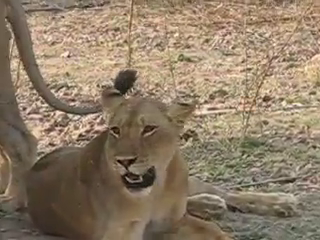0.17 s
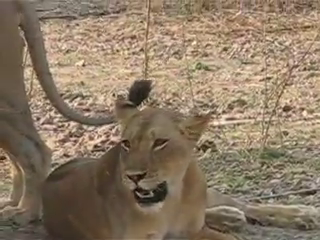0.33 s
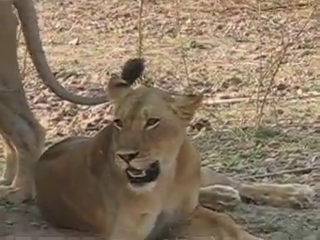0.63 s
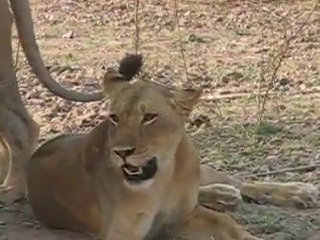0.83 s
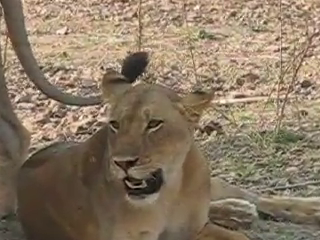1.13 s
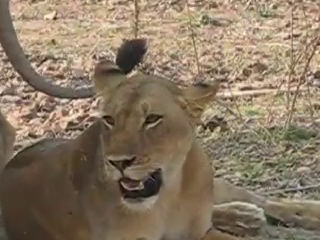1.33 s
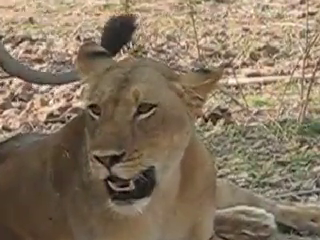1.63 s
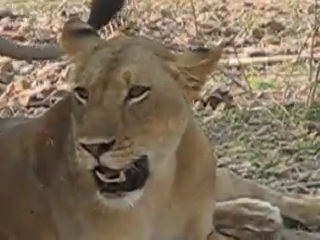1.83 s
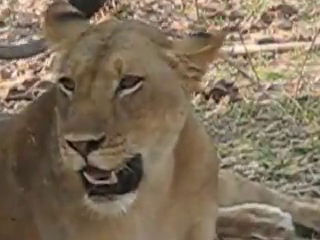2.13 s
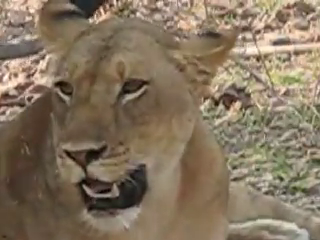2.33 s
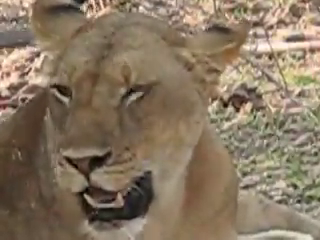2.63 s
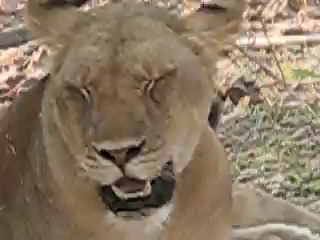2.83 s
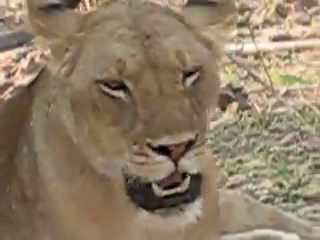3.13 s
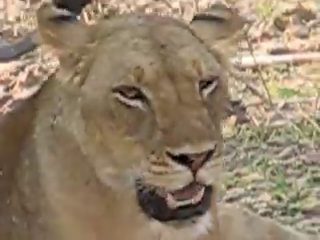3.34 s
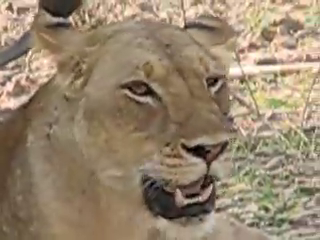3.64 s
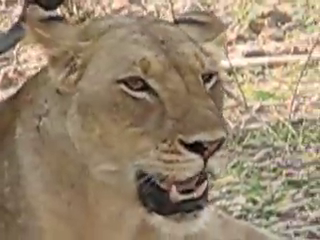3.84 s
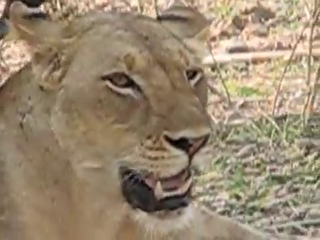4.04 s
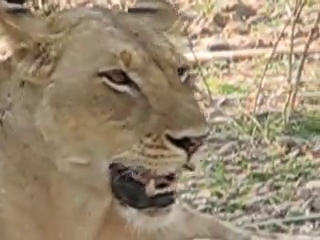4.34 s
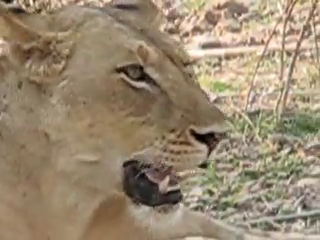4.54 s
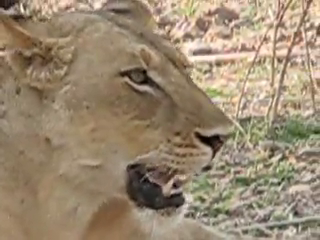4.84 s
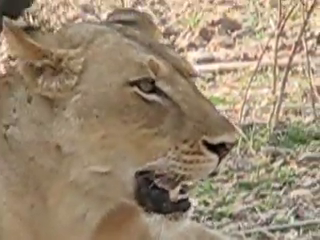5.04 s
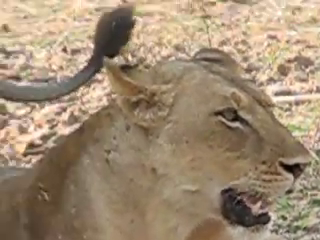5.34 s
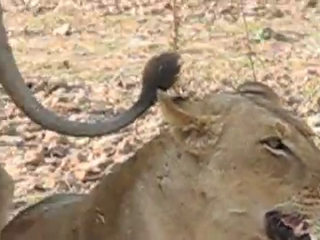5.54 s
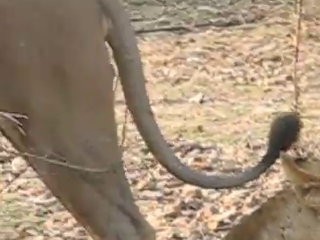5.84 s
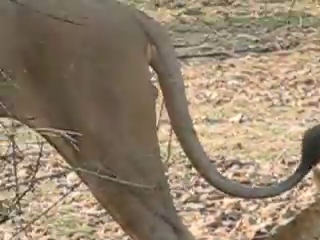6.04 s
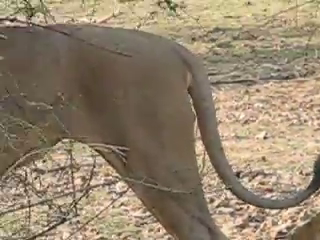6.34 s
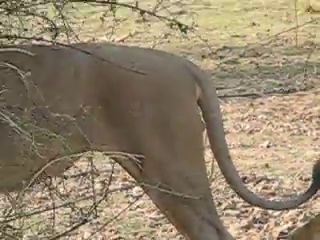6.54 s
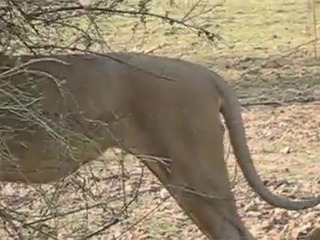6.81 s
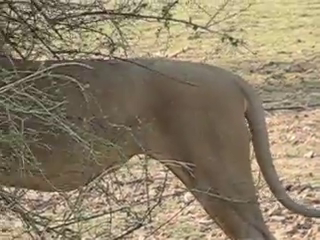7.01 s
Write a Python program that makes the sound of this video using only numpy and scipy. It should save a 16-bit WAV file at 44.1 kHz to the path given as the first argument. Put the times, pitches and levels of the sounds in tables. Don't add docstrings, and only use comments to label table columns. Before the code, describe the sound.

Deep, throaty lion roars shrink into a steady run of hoarse grunts, each after a rasping breath, with faint insects, snapping twigs and far birds.

```python
import sys
import numpy as np
from scipy import signal
from scipy.io import wavfile
from scipy.ndimage import uniform_filter1d

SR = 44100
rng = np.random.default_rng(int(sys.argv[2]) if len(sys.argv) > 2 else 0)


def makeup_ratio(level_db):
    decades = np.asarray(level_db, float) / 20
    return 10 ** decades


def wrap_up_sound(samples):
    columns = np.atleast_2d(samples).T
    tamed = np.clip(columns, -1, 1)
    steps = np.round(tamed * 32767).astype(np.int16)
    wavfile.write(sys.argv[1], SR, steps)


N = 316197


def rms_one(x):
    return x / np.sqrt(np.mean(np.abs(x) ** 2) + 1e-20)


def play(tables, column, fade=0.0236):
    t = np.arange(N) / SR
    rows = np.array(sorted(row for table in tables for row in table))
    gate = 0
    for table in tables:
        first, last = table[0][0], table[-1][0]
        already_sounding = (first == 0) * (t < .1)
        gate = gate + np.clip(np.minimum(t - first, last - t) / fade + already_sounding, 0, 1)
    return np.interp(t, rows[:, 0], rows[:, column]), np.minimum(gate, 1)


def at_hz(points, hz):
    points = np.array(points)
    return np.interp(np.log(hz), np.log(points[:, 0]), points[:, 1])


def drift(hz):
    r = np.exp(-2 * np.pi * hz / SR)
    return rms_one(signal.lfilter([1], [1, -2 * r, r * r], rng.standard_normal(N + SR))[SR:])


def turns(hz):
    return 2 * np.pi * np.cumsum(hz * np.ones(N)) / SR


def narrow(hz, width_hz):
    phase = turns(hz)
    return rms_one(drift(width_hz) * np.cos(phase) + drift(width_hz) * np.sin(phase))


def tract(x, modes, patchy_db=0):
    out = 0
    for k, (hz, width_hz, db) in enumerate(modes):
        r = np.exp(-np.pi * width_hz / SR)
        b = (1 - r * r) / 2 * np.array([1, 0, -1])
        gain = makeup_ratio(db + patchy_db * drift(9.7)) if patchy_db else makeup_ratio(db)
        out = out + (-1) ** k * gain * signal.lfilter(b, [1, -2 * r * np.cos(2 * np.pi * hz / SR), r * r], x)
    return out


def strikes(times, db, fall_s):
    clicks = np.full(N, 1e-18)
    clicks[np.round(np.array(times) * SR).astype(int)] = makeup_ratio(db)
    return signal.lfilter([1], [1, -np.exp(-1 / (fall_s * SR))], clicks)


def air_levels(low_db, breathing_in, voiced, rasp_db, starts):
    # level in dB at a push of -10 dB, slope in dB per dB of push.
    air_out = [(-21, 1.05), (-30, 0.9), (-38, 0.58)]
    # level in dB, slope in dB per dB of push.
    air_in = [(-26.5, 0.6), (-27, 0.54), (-28, 0.8)]
    second_db, mouth_db, hiss_db = [
        np.where(breathing_in, a + b * (low_db + 12.5), c + d * (low_db + 10))
        for (a, b), (c, d) in zip(air_in, air_out)]
    second_db = second_db + rasp_db
    mouth_db = mouth_db + 0.87 * rasp_db + 2.5 * strikes(starts, 0, 0.054)
    hiss_db = hiss_db - 23 * strikes(starts, 0, 0.013)
    throb_db, throb_s, throb_lag_s = 2.5, 0.0748, 0.019
    t = np.arange(N) / SR
    since = t - np.array([0] + starts)[np.searchsorted(starts, t)]
    throb = throb_db * voiced * np.cos(2 * np.pi * (since - throb_lag_s) / throb_s)
    return second_db + 0.43 * throb, mouth_db + 0.68 * throb, hiss_db + throb


def throat(pitch, phase, voiced, slack, bark):
    second_hz = 400 - 35 * slack * voiced + 22 * drift(6.0)
    sides = narrow(345, 16) + .7 * narrow(450, 20)
    second = .8 * narrow(second_hz, 14) + (.2 + .4 * bark + .3 * slack) * sides
    for k in (2, 3):
        crossing = .12 + .85 / (1 + ((k * pitch - second_hz) / 36) ** 2)
        second = second + voiced * crossing * np.sin(k * phase)
    return second


def flaps(starts, intake_starts):
    # start in seconds, peak in the mouth in dB, chest thump in dB.
    slaps = [(0.001, -15, -32), (0.323, -25.5, -21), (0.538, -21.5, -14), (0.607, -36, -18),
             (0.681, -18.5, -25), (0.734, -22, -40), (1.244, -24, -21.5), (1.489, -28, -14),
             (1.733, -20.5, 7), (1.821, -17, -4.5), (1.887, -19.5, -27), (1.917, -19, -31),
             (2.653, -32.5, -24), (2.687, -21, -47), (3.209, -17, -25.5), (3.278, -31, -17.5),
             (3.662, -23, -19), (3.726, -16.5, -40), (4.352, -14.5, -14), (4.502, -22, -34),
             (5.021, -24, -30), (5.127, -13, -23.5), (5.368, -29, -54), (5.785, -15.5, -29.5),
             (5.862, -27.5, -39), (5.963, -19.5, -12.5), (6.546, -30.5, -23.5), (6.616, -10.5, -19.5),
             (6.8, -14, -14.5), (6.841, -17.5, -17)]
    slaps = slaps + [np.add((.009, -22, -14), (s, 0, 0)) for s in starts]
    slaps = slaps + [np.add((.006, -26, -29), (s, 0, 0)) for s in intake_starts]
    times, flap_db, thump_db = np.transpose(slaps)
    slap = signal.lfilter([.05], [1, -.95], strikes(times, flap_db, .016))
    blow = np.diff(strikes(times, np.minimum(thump_db, -14), 0.0013), prepend=0)
    knock = signal.lfilter([.05], [1, -.95], blow)
    return slap, makeup_ratio(48.5) * tract(knock, [(125.4, 15.3, 10.0), (390, 42, 0.62)])


def mouth_air(phase, voiced, slack, bark):
    # resonance in Hz, width in Hz, level in dB.
    mouth = [(554.3, 51, 1), (683, 66, 1.5), (822, 113, 1), (920, 138, -2), (1074.5, 49, 2), (1214, 44, 0),
             (1304, 50, -1.5), (1623, 270, -0.5)]
    # resonance in Hz, width in Hz, level in dB.
    teeth = [(2092, 143, 3), (2497, 92, 5), (2765, 71, 3), (3217, 320, 2), (3630, 1050, -3), (4546, 132, 1),
             (5050, 690, -2.5), (6020, 1110, -1), (7420, 950, -4.5), (8900, 1600, -16), (13300, 1300, -50)]
    puffs = 1 + .45 * voiced * np.cos(phase)
    air = rng.standard_normal((3, N)) * puffs * makeup_ratio((1.4 + 1.4 * slack) * drift(28))
    narrowed = makeup_ratio(-8 * np.clip((.62 - np.arange(N) / SR) / 0.3, 0, 1))
    rasp = rms_one(tract(air[:2], mouth[:-1], patchy_db=2.5))
    rasp = rasp + 0.83 * bark * rms_one(tract(air[:2], mouth[2:4]))
    lower_hiss = narrowed * tract(air[1:], mouth[-1:] + teeth[:2], patchy_db=3.0)
    return rasp, rms_one(lower_hiss + tract(air[1:], teeth[2:], patchy_db=2.5))


def lion():
    # start in seconds, push in dB, fold pitch in Hz, extra rasp in dB.
    roars = [
        [(0.0, -12, 182, 9.5), (0.118, -12.5, 181.7, 4.5), (0.3, -13.5, 170.4, 10.5), (0.456, -9.5, 158.8, 5.5),
         (0.616, -7, 134.4, -4), (0.652, -14.5, 118, -4), (0.69, -23.5, 122, 5), (0.8, -40.5, 142, 0)],
        [(1.453, -22, 123.8, -23), (1.495, -9, 120.9, 1.5), (1.551, -3.5, 142.3, 2.5), (1.6, -9, 141.6, -2.5),
         (1.66, -15.5, 128.8, 6), (1.76, -9, 128.1, -3), (1.867, -15, 113.5, 0.5), (1.94, -22, 134.7, -6.5),
         (2.02, -41.5, 141.8, 0)],
    ]
    calls, breaths = roars + grunts(), intakes()
    low_db, on = play([[row[:2] for row in call] for call in calls + breaths], 1, fade=.004)
    pitch, voiced = play(calls, 2)
    breathing_in = play(breaths, 1, fade=.001)[1] > 0
    rasp_db = play(calls, 3)[0] * ~breathing_in
    starts = [call[0][0] for call in calls[1:]]
    second_db, mouth_db, hiss_db = air_levels(low_db, breathing_in, voiced, rasp_db, starts)

    bark = strikes(np.add(starts, .015), 0, .09)
    slack = np.clip((-13 - low_db) / 9, .02, 1)
    pitch = pitch + (98 - pitch) * np.clip(1.6 * slack - .3, 0, 1)
    slack = np.maximum(slack, 1 - voiced)
    flutter = np.sin(turns(36 * makeup_ratio(1.128 * drift(8.1))))
    beat = makeup_ratio((5 * slack + 3 * bark) * flutter - 1.6 * slack ** 2)
    phase = turns(pitch * (1 + .008 * drift(25)))

    tone = voiced * np.sqrt(2 - 1.4 * slack - bark / 2) * np.sin(phase)
    rumble = np.sqrt(slack * (1 - .25 * voiced)) * narrow(143, 22)
    low = tone + rumble + (.05 + .6 * bark) * narrow(185, 26)
    second = throat(pitch, phase, voiced, slack, bark)
    slap, thump = flaps(starts, [breath[0][0] for breath in breaths])
    push = makeup_ratio(low_db - 32 + 24.4 * slack) * narrow(60, 14)
    body = on * beat * (makeup_ratio(low_db) * low + makeup_ratio(second_db - 1.0) * second + push) + thump

    rasp, hiss = mouth_air(phase, voiced, slack, bark)
    slack_cut_db = -3 * slack * voiced
    rasp = rasp * (on * beat ** 0.7 * makeup_ratio(mouth_db - 3.0 + slack_cut_db) + makeup_ratio(-14.5) * slap)
    hiss = hiss * (on * beat ** .5 * makeup_ratio(hiss_db + 2.0 + slack_cut_db) + makeup_ratio(-18) * slap)
    wide_rasp = rasp[0] + 0.12 * rasp[1] * [[1], [-1]]
    wide_hiss = hiss[0] + 0.49 * hiss[1] * [[1], [-1]]
    upper = wide_rasp + wide_hiss * makeup_ratio([[1.2], [-1.8]])
    for hz in (645, 1850):
        upper = signal.lfilter(*signal.iirnotch(hz, 9.0, SR), upper)

    ground = makeup_ratio(-40) * np.roll(body, round(0.0096 * SR)) * [[1], [-1]]
    left, right = body * makeup_ratio([[.2], [-.2]]) + upper + ground
    return np.array([left, np.roll(right, 2)])


def bush():
    # frequency in Hz, density in dB per Hz.
    air_spectrum = [(15, -46), (25, -8), (81, -14), (115, 0), (147, -9.5), (238, -12.5), (355, -12),
                    (641, -20), (1070, -20.5), (1510, -29), (2320, -30), (6780, -35.5), (8630, -23),
                    (9870, -43), (15200, -56)]
    # frequency in Hz, left-right likeness from 0 to 1.
    likeness = [(60, 0.83), (180, 0.88), (540, 0.78), (1630, 0.46), (4890, 0.2), (14700, 0.11)]
    out, edges = 0, 25 * 2 ** np.arange(0, 9.6, .5)
    white = rng.standard_normal((2, 2, N))
    for k, (low, high) in enumerate(zip(edges, edges[1:])):
        band = signal.butter(2, [low, high], "band", fs=SR, output="sos")
        mid, side = signal.sosfilt(band, white[k % 2])
        hz = np.sqrt(low * high)
        alike = np.clip(at_hz(likeness, hz), -1, 1)
        stereo = np.sqrt(1 + alike) * mid + np.sqrt(1 - alike) * side * [[1], [-1]]
        out = out + makeup_ratio(at_hz(air_spectrum, hz)) * stereo
    drone = makeup_ratio(-32) * narrow(142, 11.0)
    return makeup_ratio(-32 + drift(1.9)) * rms_one(out) + drone


def insects():
    # pitch in Hz, level in dB.
    singers = [(7854, -67), (7881, -53), (8452, -81), (8511, -48.5), (8570, -79.5)]
    tones = sum(makeup_ratio(db + 12.0 + 0.8 * drift(10)) * np.sin(turns(hz + 2.5 * drift(5))) for hz, db in singers)
    t = np.arange(N) / SR
    top_s, period_s = 3.8, 2.2
    climb = np.cos(np.pi * (t - top_s) / period_s) ** 4
    whine_db = -67 + 5 * climb - 12 * np.exp(-t / 1.9)
    whine_hz = 9200 + 1140 * climb + 120 * drift(2.6)
    whine = makeup_ratio(whine_db + 6.5 + 3.2 * drift(4.4)) * narrow(whine_hz, 170)
    return np.array([np.roll(tones, 1), tones]) * makeup_ratio([[-5], [3]]) + whine * makeup_ratio([[1], [-1]])


def ducking(loud):
    level_db = 10 * np.log10(uniform_filter1d(np.mean(loud ** 2, axis=0), size=2000) + 1e-9)
    t = np.arange(N) / SR
    climb = 14 * t
    over_db = np.maximum(1.04 * (level_db + 22.0), 0)
    cut_db = np.maximum.accumulate(over_db + climb) - climb
    cut_db += 9 * np.exp(-t / 1.5)
    r = np.exp(-1 / (.06 * SR))
    return makeup_ratio(-signal.lfilter([1 - r], [1, -r], cut_db, zi=[r * cut_db[0]])[0])


def ticks():
    # start in seconds, peak in dB, pitch in Hz, bright edge in dB, left-right balance in dB.
    snaps = [(4.61, -44, 1440, -61.5, 26), (6.877, -32, 1200, -46.5, 2), (6.932, -27.5, 1290, -71, 4),
             (6.963, -37.5, 1180, -48.5, 4), (6.996, -29, 724, -73, 6), (7.024, -32.5, 820, -70, -21),
             (7.036, -25, 1050, -52, 13), (7.057, -19.5, 4860, -51, 10.5), (7.075, -29, 970, -48, -6),
             (7.126, -28, 924, -59, 2.5)]
    # start in seconds, peak in dB, pitch in Hz, bright edge in dB, left-right balance in dB.
    big_snap = (2.5197, -4, 1036, -19, -9)
    # start in seconds, level in dB.
    rustle = [(4.82, -54), (4.838, -54.5), (4.904, -58.5), (5.02, -63)]
    # start in seconds, level in dB.
    murmur = [
        (1.0, -63.5),
        (2.9, -51),
        (6.4, -49.5),
        (7.17, -40.5),
    ]
    out = np.zeros((2, N))
    t = np.arange(round(.03 * SR)) / SR
    for s, db, hz, edge_db, pan_db in [big_snap] + snaps:
        spread = .0004 + .0005 * makeup_ratio(db)
        burst = rng.standard_normal(len(t)) * (t / spread) ** 3 * np.exp(-t / spread)
        ring = tract(burst, [(hz, 0.33 * hz, 0), (2250, 300, -6 + 0.27 * db), (1020, 120, 3), (4600, 900, -20)])
        edge = tract(burst, [(7700, 1100, 2), (13600, 2400, 0)])
        side = np.array([[pan_db / 2], [-pan_db / 2]])
        snap = makeup_ratio(db + .4 * side) * ring / np.abs(ring).max()
        snap = snap + makeup_ratio(edge_db + 13 + 1.2 * side) * edge / np.abs(edge).max()
        out[:, round(s * SR):round(s * SR) + len(t)] += np.array([snap[0], np.roll(snap[1], 1)])
    rustle_db, on = play([rustle], 1, fade=.004)
    grit = rng.standard_normal(N) * makeup_ratio(3.1 * drift(40))
    grain = tract(grit, [(6800, 3600, 2.0), (8560, 630, 10.5), (13000, 2400, -12)])
    stir = rng.standard_normal((2, N)) * makeup_ratio(2.8 * drift(11))
    dull = [(303, 190, -1.5), (512, 350, -2.5), (875, 310, -1.0), (1330, 1800, -9)]
    leaves = tract(stir, dull, patchy_db=-2.5)
    out += makeup_ratio(play([murmur], 1)[0]) * rms_one(leaves[0] + 0.82 * leaves[1] * [[1], [-1]])
    return out + on * makeup_ratio(rustle_db + 17) * rms_one(grain) * makeup_ratio([[-7], [4]])


def intakes():
    # start in seconds, length in seconds, level at the start in dB,
    # loudest point in seconds after the start, level there in dB.
    snores = [(1.125, 0.317, -42.5, .21, -24), (2.308, 0.1188, -28, 0.068, -22.5),
              (3.067, .272, -27.5, .19, -16.5), (4.124, 0.131, -23.5, 0.034, -26.5),
              (4.927, 0.126, -32, 0.031, -24.5), (5.734, .13, -26, 0.065, -24.5),
              (6.484, 0.187, -33.5, 0.075, -26.5)]
    swell_s, choke_s, choke_db = 0.096, 0.0348, -9.5
    return [[(s, first_db), (s + max(top_s - swell_s, .01), first_db - 0.5), (s + top_s, top_db),
             (s + length_s - choke_s, top_db - 3.0), (s + length_s, top_db + choke_db - 6.5)]
            for s, length_s, first_db, top_s, top_db in snores]


def grunts():
    # start in seconds, end of the full push in seconds after the start, length in seconds,
    # pitch at the start in Hz, pitch at full push in Hz.
    pushes = [(2.449, 0.04418, 0.31, 152.3, 145.3), (3.352, .1, 0.44, 158.5, 138),
              (4.267, 0.1028, .31, 138.8, 133.7), (5.088, 0.0744, .325, 135.8, 139.9),
              (5.88, 0.0943, 0.31, 149.7, 132), (6.677, .055, 0.3, 160.7, 160)]
    start_db, full_db, eased_db, spent_db, end_db = -13, -6, -11.5, -15.5, -37.5
    attack_s, ease_s, release_s, tail_hz = 0.0318, 0.0411, .14, 139.8
    calls = []
    for s, full_s, length_s, first_hz, full_hz in pushes:
        end = s + length_s
        calls.append([
            (s, start_db, first_hz, 0),
            (s + attack_s, full_db, first_hz, 0),
            (s + max(full_s, attack_s + .005), full_db, full_hz, 0),
            (s + full_s + ease_s, eased_db, .96 * full_hz, 0),
            (end - release_s, spent_db, .86 * full_hz, 0),
            (end - release_s / 2, (spent_db + end_db) / 2 + 3.0, tail_hz, 0),
            (end, end_db, tail_hz, 0)])
    return calls


def moan():
    # start in seconds, pitch in Hz, level in dB.
    glide = [(2.76, 90, -59), (2.902, 85.9, -54.5), (2.996, 128.6, -51.5), (3.068, 142.4, -44),
             (3.075, 140.4, -64)]
    # frequency in Hz, throat gain in dB.
    throat_gain = [(80, 7), (270, 5), (420, 4), (620, -13), (800, -24)]
    pitch, on = play([glide], 1, fade=0.014)
    db = play([glide], 2)[0]
    phase = turns(pitch * (1 + 0.008 * drift(23)))
    harmonics = sum(makeup_ratio(at_hz(throat_gain, k * pitch)) * np.sin(k * phase) for k in range(1, 9))
    return on * makeup_ratio(db + 3.5) * harmonics


def birds():
    # start in seconds, length in seconds, first pitch in Hz, last pitch in Hz, level in dB.
    chirps = [(3.792, .09, 2740, 2520, -49), (4.028, .03, 2750, 2580, -51), (4.103, .06, 2500, 2380, -45),
              (5.84, .035, 3150, 3150, -55)]
    # seconds after the start, share of the top pitch, level in dB.
    rise = [(0, .57, -10), (.014, .68, -4), (.048, .65, -7), (.066, .85, -4), (.1, 1.0, 0)]
    # start of a whistle in seconds, top pitch in Hz, level in dB, hold of the top note in seconds.
    rises = [(5.587, 3190, -54, .055), (6.215, 3120, -54, .02)]
    calls = []
    for s, length_s, first_hz, last_hz, db in chirps:
        calls.append([(s, .92 * first_hz, db - 9), (s + .014, first_hz, db), (s + length_s, last_hz, db - 7)])
    for s, hz, db, held_s in rises:
        steps = rise + [(rise[-1][0] + held_s, 1, -7)]
        calls.append([(s + dt, share * hz, db + step_db) for dt, share, step_db in steps])
    pitch, on = play(calls, 1, fade=0.0048)
    db = play(calls, 2)[0]
    song = on * makeup_ratio(db + 18 + 1.2 * drift(14)) * np.sin(turns(uniform_filter1d(pitch, size=500)))
    return np.array([song, np.roll(song, 9)]) + makeup_ratio(-16) * np.roll(song, round(.012 * SR))


def scene():
    near = lion()
    return near + ducking(near) * (insects() + bush()) + moan() + birds() + ticks()


def band_limit(x):
    return signal.sosfilt(signal.butter(12, 15780, fs=SR, output="sos"), x)


def record(dry):
    cut = signal.sosfilt(signal.cheby2(8, 40, 17500, fs=SR, output="sos"), dry)
    return band_limit(np.clip(cut, -1, 1))


dry = scene()
out = record(dry)
wrap_up_sound(out)
```